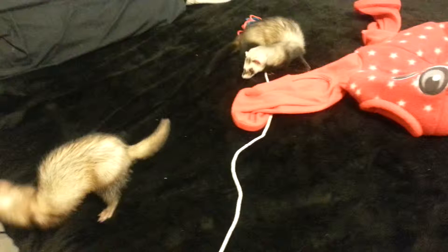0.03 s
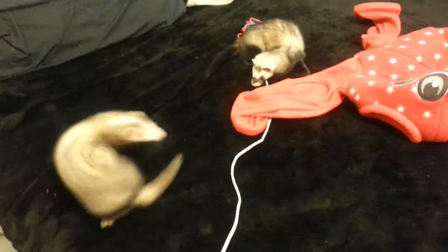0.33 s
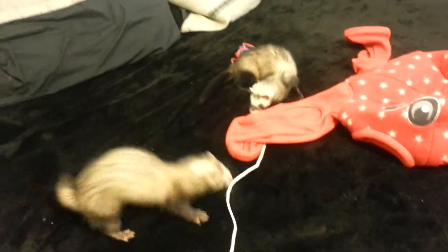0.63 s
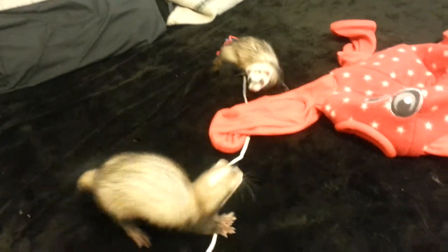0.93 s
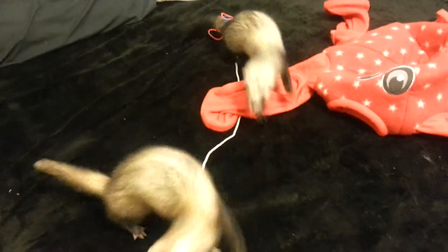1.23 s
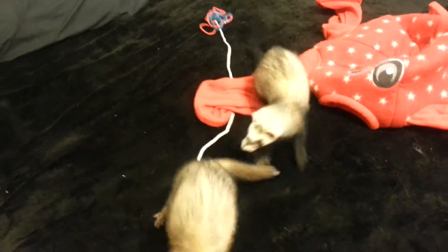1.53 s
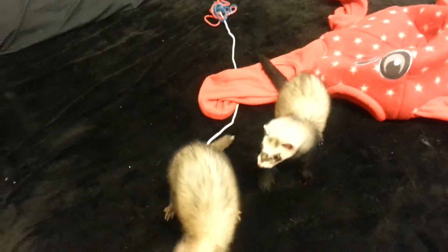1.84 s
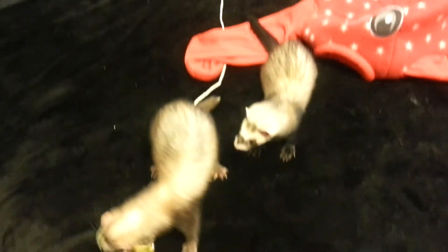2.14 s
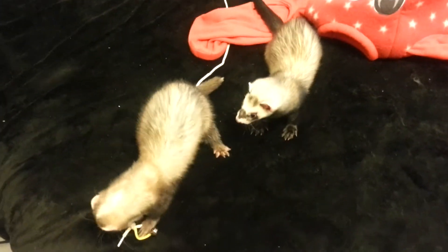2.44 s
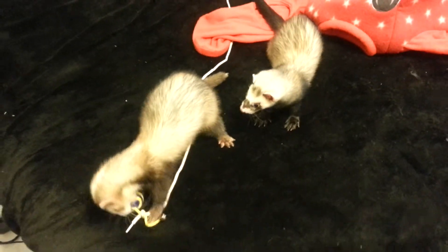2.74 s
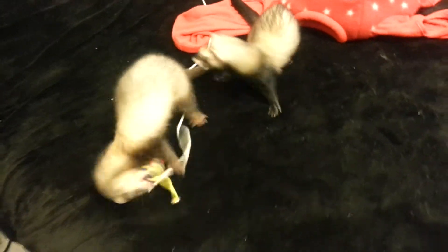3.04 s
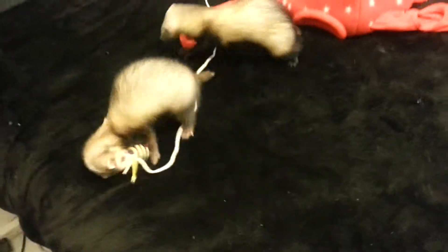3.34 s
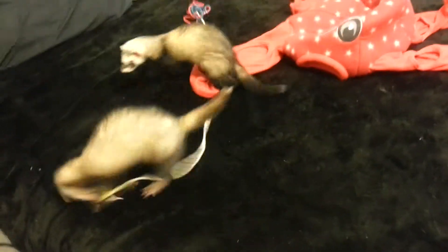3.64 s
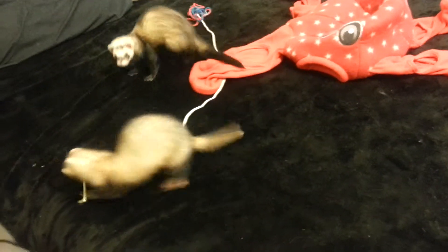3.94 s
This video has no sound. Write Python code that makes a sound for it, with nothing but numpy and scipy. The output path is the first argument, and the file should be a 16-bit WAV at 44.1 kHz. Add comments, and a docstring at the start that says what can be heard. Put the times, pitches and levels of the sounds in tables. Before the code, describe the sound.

A toy's small bell jingles faintly from about 1.6 seconds, then from 3 seconds to the end the toy crinkles, snaps and jingles louder, slightly to the right. Ferrets scuff softly over a blanket, with thin rubbing squeaks in the first second and faint clucks around 1.4 to 1.8 and at 3.4 seconds. Soft low bumps hit the close microphone throughout, over a quiet room hum.

```python
"""A quiet room with a low mains hum; two ferrets play on a fleece blanket, close to a hand-held camera.
Paws and fur scuff over the cloth, and a few clucks pulse from the throat. The ferrets tug a string toy,
right of centre, whose small bell jingles as its pellet strikes the shell; near the end the toy crinkles
and snaps. Soft low bumps reach one microphone port at a time."""
import sys
import numpy as np
from scipy import signal
from scipy.fft import rfft, irfft, next_fast_len
from scipy.io import wavfile
from scipy.ndimage import map_coordinates

SR = 44100
rng = np.random.default_rng(int(sys.argv[2]) if len(sys.argv) > 2 else 0)


def int16_out(signal):
    """Quantize to a 16-bit WAV file."""
    q = np.round(np.clip(np.atleast_2d(signal).T, -1, 1) * 32767)
    wavfile.write(sys.argv[1], SR, q.astype(np.int16))


N = 176400  # 4 s

# Spectrum of the toy's creases and snaps: f/Hz, level/dB
TOY_SPECTRUM = [(300, -26), (1500, -17.5), (2400, -12), (3500, 0), (4500, 2.5), (6200, -5.5), (8600, -4),
                (11800, -7), (15000, -9.5)]


def bell():
    """In each shake a pellet strikes the shell and rings its modes anew, each time slightly detuned."""
    # Shakes of the bell: t/s, length/s, level/dB, weight of deep modes/dB, weight of high modes/dB
    shakes = [(1.612, 0.028, -58, 7, 1), (1.639, 0.016, -53.5, 13, 3), (1.678, 0.041, -55, 0, -1),
              (1.81, .02, -60.5, 4, 2), (1.846, 0.014, -57, 2, 2), (1.876, .01, -54.5, -13, -9),
              (1.908, 0.017, -62.5, 0, 13), (1.994, 0.024, -59, 1, 7), (2.04, .012, -54.5, 9, 5.5),
              (2.497, 0.014, -56.5, 3, 11), (3.132, 0.008, -47, -1, -5), (3.196, 0.016, -47, -4, 12),
              (3.264, 0.0099, -40, -16, -2), (3.284, 0.029, -42, -6, -8), (3.325, 0.015, -49, 2, 2),
              (3.368, 0.034, -49, -4, 9.5), (3.433, .057, -52, 4, 8), (3.541, 0.01, -43, -6, 5.5),
              (3.56, .02, -42, -3, 2), (3.625, 0.017, -43, 0, 7), (3.655, 0.049, -42, 0, 1),
              (3.71, 0.028, -47.5, 4, 7), (3.783, .01, -45.5, -9, -7), (3.85, 0.015, -43, 0, 0),
              (3.872, 0.083, -50.5, 14, 8), (3.981, 0.015, -52, 2, 8)]
    # Modes of the shell: f/Hz, level/dB, t60/s
    modes = [(4170, -6, 0.15), (4340, -14, 0.15), (4818, 2.5, 0.089), (4850, -1, 0.066),
             (9240, -13.5, 0.074), (9415, -14.5, 0.1), (10710, -9, 0.095)]
    deep_hz, high_hz = 4500, 7000  # deep modes lie below the first, high modes above the second
    strikes_per_s, loss_per_strike_db, scatter_db, detune = 130, 1.2, 3, 0.0018
    out, t = np.zeros(N), np.arange(SR // 4) / SR
    hz, mode_db, t60 = np.transpose(modes)[..., None]
    decay = amp(mode_db - 60 * t / t60)
    for s, length, db, deep_db, high_db in shakes:
        shake = np.zeros(len(t))
        slip, chance = rng.random(16), rng.standard_normal((16, 3, len(modes), 1))
        weight_db = deep_db * (hz < deep_hz) + high_db * (hz > high_hz)
        for k in range(min(len(slip), 1 + int(length * strikes_per_s))):
            force, mistune, phase = chance[k]
            ring = decay * np.sin(2 * np.pi * (hz * (1 + detune * mistune) * t + phase))
            gain = amp(scatter_db * force - loss_per_strike_db * k + weight_db)
            add(shake, (k - slip[k] * (k > 0)) / strikes_per_s, np.sum(ring * gain, axis=0))
        add(out, s, amp(db) * shake / np.std(shake[:int(length * SR) + SR // 100]))
    low = filtered(out, lambda f: f < high_hz)
    high = out - low
    return from_toy(low * pan(-10) + high) + room(out, wet_db=-2)


def crinkle():
    """The crumpled toy gives dense tiny crease clicks, a hiss and snaps, all from one spot in the room."""
    # How hard the toy is crumpled: t/s, level/dB
    crumple = [(3, -67), (3.128, -59.5), (3.14, -49.5), (3.195, -47), (3.24, -56), (3.305, -51.5),
               (3.35, -59.5), (3.53, -54), (3.585, -45), (3.635, -48.5), (3.665, -41), (3.735, -50),
               (3.812, -55), (3.821, -44), (3.87, -51), (3.92, -59)]
    # The toy's colour across the ports: f/Hz, left minus right/dB
    balance = [(3200, 0), (4600, -9), (6300, -4.5), (8300, 2.5), (12000, 1.5)]
    creases_per_s, spread_db = 700, 5.5
    creases = (rng.random(N) < creases_per_s / SR) * rng.choice([-1, 1], N)
    creases = creases * amp(spread_db * np.minimum(rng.standard_normal(N), 2))
    hiss = 0.41 * rng.standard_normal(N)
    envelope = amp(curve(crumple)) * (np.arange(N) / SR > crumple[0][0])
    toy = envelope * unit(coloured(unit(creases) + hiss, TOY_SPECTRUM)) + snaps()
    at_ports = from_toy(toy) + room(toy.mean(axis=0), wet_db=-1.5)
    return filtered(at_ports, lambda hz: amp(along(balance, hz) * np.array([[1], [-1]]) / 2))


def snaps():
    """Single sharp cracks of the toy, partly different at each port; the hard ones have a bright edge."""
    # Cracks, before colouring: t/s, level/dB, edge relative to body/dB
    cracks = [(3.213, -26.5, -18), (3.3019, -31.5, -19), (3.436, -27.5, -16), (3.5742, -27.5, 8),
              (3.5877, -32, 3), (3.6161, -24, 4.5), (3.653, -28, -1), (3.7465, -25.5, -13),
              (3.7553, -30, 2), (3.7848, -21.5, -19), (3.818, -31, 0)]
    # Bright edge of a hard snap: f/Hz, level/dB
    edge_spectrum = [(5000, -22), (8900, 3.5), (15000, -12)]
    t60_s = 0.0089
    body, edge, t = np.zeros((2, N)), np.zeros((2, N)), np.arange(SR // 20) / SR
    for s, db, edge_db in cracks:
        crack = (rng.standard_normal(len(t)) + rng.standard_normal((2, len(t)))) * amp(-60 * t / t60_s)
        crack /= np.std(crack[:, :SR // 1000])
        add(body, s, amp(db) * crack)
        add(edge, s, amp(db + edge_db) * crack)
    return (coloured(body, TOY_SPECTRUM) + coloured(edge, edge_spectrum)) / 2


def from_toy(x):
    """The toy lies to the right, so its sound reaches the left port a little later."""
    lag_s = .00011
    return filtered(x, lambda hz: np.exp(1j * np.pi * hz * lag_s * np.array([[-1], [1]])))


def clucks():
    """A ferret clucks close by: a handful of slightly rough throat pulses each time."""
    # Clucks: t/s, length/s, level/dB, f/Hz
    calls = [(1.421, 0.038, -49.5, 226), (1.469, 0.023, -62, 224), (1.698, 0.029, -58.5, 219.4),
             (1.797, 0.034, -50, 221), (3.416, 0.016, -53.5, 254)]
    # Resonances of the throat: f/Hz, level/dB
    throat = [(120, -28), (225, -12), (450, -3.5), (680, -4.5), (900, 1), (1100, -24), (1400, -16),
              (2000, -24), (4000, -40)]
    roughness, jitter = 0.39, .015
    voice, t = np.zeros(N), np.arange(SR // 10) / SR
    for s, length, db, hz in calls:
        phase = 2 * np.pi * np.cumsum(hz * (1 + jitter * wobble(150)[:len(t)])) / SR
        tone = unit(sum(amp(along(throat, k * hz)) * np.cos(k * phase) for k in range(1, 12)))
        rasp = noise(throat)[0, :len(t)] * (1 + np.cos(phase))
        swell = np.sin(np.pi * np.clip(t / length, 0, 1))
        add(voice, s, amp(db) * swell * (tone + roughness * rasp))
    return voice + room(voice, wet_db=-6)


def scuffs():
    """Paws, fur and bodies rub the fleece: a soft rasp with a squeak, a finer hiss, and dull drags."""
    # Scuffs of paws and fur: t/s, length/s, level/dB, hiss relative to rasp/dB
    strokes = [(0.457, 0.088, -58, -5), (1.068, 0.095, -59.5, 2), (1.265, .04, -62, 2),
               (1.687, 0.13, -59, -1.5), (2.229, 0.11, -59.5, 1.5), (2.334, 0.065, -60.5, 2),
               (2.515, 0.066, -59, 6), (2.868, 0.054, -60.5, -6), (2.935, 0.063, -58.5, -1)]
    # Drags of a body over the blanket: t/s, length/s, level/dB
    drags = [(1.253, 0.078, -55.5), (3.13, 0.25, -58.5), (3.532, 0.085, -56), (3.605, 0.066, -49.5),
             (3.683, 0.2, -59.5)]
    # Rasp of the cloth: f/Hz, level/dB
    cloth = [(900, -16), (2900, -0.5), (4700, -4.5), (6000, -17), (12000, -31)]
    # Hiss of the fur: f/Hz, level/dB
    fur = [(2500, -5.5), (4500, 4.5), (6500, 1.5), (9000, 0), (12000, -2), (15000, -22)]
    # Dull rub of a body: f/Hz, level/dB
    body = [(100, -28), (300, 0.5), (700, -3.5), (1000, -7), (2000, -17.5), (5000, -36)]
    rasp = sum(amp(db) * stroke(s, length) for s, length, db, _ in strokes)
    hiss = sum(amp(db + hiss_db) * stroke(s, length) for s, length, db, hiss_db in strokes)
    drag = sum(amp(db) * stroke(s, length) for s, length, db in drags)
    whine = sum(amp(db - 3.5) * squeak(s, length, hz=3050) for s, length, db, _ in strokes)
    flicker = amp(1.2 * wobble(90))
    return flicker * (rasp * noise(cloth) + whine + hiss * noise(fur) + drag * noise(body))


def squeaks():
    """Thin squeaks where something rubs."""
    # Rubs: t/s, length/s, level/dB, starting f/Hz
    rubs = [(.385, 0.031, -62, 5540), (0.551, 0.054, -57, 4660), (1.081, 0.096, -65, 2890)]
    return sum(amp(db) * squeak(s, length, hz) for s, length, db, hz in rubs)


def squeak(s, length, hz):
    """One rub: a narrow band of noise whose pitch falls through the stroke."""
    half_width_hz, fall_per_s = .05 * hz, 1
    age = np.clip(np.arange(N) / SR - s, 0, 2 * length)
    phase = 2 * np.pi * np.cumsum(hz * np.exp(-fall_per_s * age)) / SR
    flutter = unit(filtered(rng.standard_normal((2, N)), lambda f: 1 / (1 + (f / half_width_hz) ** 2)))
    return stroke(s, length) * flutter * np.sqrt(2) * np.sin(phase)


def bumps():
    """Right at the microphone: each bump is one dip and push of pressure, almost wholly in one port."""
    # Soft bumps: t/s, level/dB, f/Hz, port (0 left, 1 right)
    knocks = [(.199, -24, 219, 0), (.261, -37.5, 133, 1), (.41, -35, 185, 0), (.569, -29.5, 122, 0),
              (.578, -30.5, 159, 0), (0.649, -35.5, 161, 0), (.75, -25.5, 173, 0), (.961, -34.5, 133, 1),
              (.982, -36, 202, 1), (1.003, -31.5, 164, 1), (1.278, -33, 127, 1), (2.042, -35, 177, 0),
              (2.059, -33, 125, 0), (2.122, -36.5, 84.5, 1), (2.289, -33, 154, 0), (3.023, -24, 211, 0),
              (3.076, -32, 166, 1), (3.117, -34.5, 187, 0), (3.166, -32.5, 160, 0), (3.552, -33, 170, 1),
              (3.563, -30.5, 162, 1), (3.752, -34, 154, 1)]
    half_width_cycles, leak_db = 0.42, -51
    out, t = np.zeros((2, N)), np.arange(-SR // 20, SR // 20) / SR
    for s, db, hz, port in knocks:
        push = np.sin(2 * np.pi * hz * t + np.pi / 4) / np.cosh(np.pi / 2 * hz * t / half_width_cycles)
        ports_db = [[leak_db], [0]] if port else [[0], [leak_db]]
        add(out, s + t[0], amp(db) * amp(ports_db) * push)
    return out


def room(x, wet_db):
    """The room's reverberation at both ports; the treble dies first."""
    # Decay of the room: f/Hz, t60/s
    decay_times = [(200, 0.37), (2000, 0.28), (12000, 0.14)]
    hz, t, spectra = signal.stft(rng.standard_normal((2, SR // 2)), SR, nperseg=256)
    decay = amp(-60 * t / along(decay_times, hz)[:, None])
    tail = signal.istft(spectra * decay, SR, nperseg=256)[1]
    tail[:, :SR // 400] = 0  # gap before the first reflection
    return amp(wet_db) * signal.fftconvolve(x[None], tail / np.linalg.norm(tail[0]), axes=1)[:, :N]


def room_tone():
    """Steady room air, mains hum, and an uneven low rumble in each port."""
    # Room air: f/Hz, level/dB
    air_spectrum = [(40, -30), (70, -10), (110, -2.5), (170, -6), (300, -5), (620, -12.5), (1500, -15.5),
                    (4300, -19.5), (6400, -23.5), (9000, -21.5), (14000, -22)]
    # Likeness of the air at the two ports: f/Hz, correlation
    likeness = [(60, 0.18), (130, 0.25), (290, 0.6), (640, 0.24), (1400, 0.017)]
    # Low rumble: f/Hz, level/dB
    rumble_spectrum = [(20, -28), (60, -1.5), (130, -1), (250, -8), (500, -20), (1500, -49)]
    hum_hz, rumble_swing_db = 120.3, 5

    def mid_side_gains(hz):
        angle = np.arccos(np.clip(along(likeness, hz), -1, 1)) / 2
        return np.array([np.cos(angle), np.sin(angle)])

    mid, side = filtered(noise(air_spectrum), mid_side_gains)
    air = amp(-54.5) * unit(np.array([mid + side, mid - side])) * pan(-1.5)
    hum = amp(-61 + 0.92 * wobble(3.09)) * np.sqrt(2) * np.sin(2 * np.pi * hum_hz * np.arange(N) / SR)
    rumble = unit(noise(rumble_spectrum) * amp(rumble_swing_db * np.array([wobble(12), wobble(13)])))
    return air + hum + amp(-58) * rumble


def amp(db):
    """Decibels to gain."""
    return 10 ** (np.asarray(db) / 20)


def unit(x):
    """Scale to rms 1."""
    return x / np.sqrt(np.mean(x ** 2) + 1e-20)


def along(points, hz):
    """Read (f/Hz, value) points on a log axis."""
    f, v = np.transpose(points)
    return np.interp(np.log(hz + 1), np.log(f + 1), v)


def curve(rows):
    """One value per sample from (t/s, value) rows."""
    return np.interp(np.arange(N) / SR, *np.transpose(rows))


def wobble(rate):
    """A smooth random curve, rate knots a second."""
    return map_coordinates(rng.standard_normal(400), [np.arange(N) * rate / SR], mode="wrap")


def stroke(s, length):
    """Envelope of a rub: a smooth swell and a slower fall."""
    progress = (np.arange(N) / SR - s) / length
    return np.sin(np.pi / 2 * np.interp(progress, [-.1, 0.26, 1.4], [0, 1, 0])) ** 2


def pan(db):
    """Port gains for a left-minus-right level."""
    return amp(np.array([[db], [-db]]) / 2)


def add(track, s, sound):
    """Mix a sound into a track at s seconds."""
    i = max(0, round(s * SR))
    part = track[..., i:i + sound.shape[-1]]
    part += sound[..., :part.shape[-1]]


def filtered(x, response):
    """x through a frequency response."""
    m = next_fast_len(N + SR // 2)
    return irfft(rfft(x, m) * response(np.fft.rfftfreq(m, 1 / SR)), m)[..., :N]


def coloured(x, spectrum):
    """x through a (f/Hz, level/dB) colour."""
    return filtered(x, lambda hz: amp(along(spectrum, hz)))


def noise(spectrum):
    """Unrelated left and right coloured noise of rms 1."""
    return unit(coloured(rng.standard_normal((2, N)), spectrum))


def scene():
    """The ferrets, their toy and the room at the two microphone ports."""
    return room_tone() + bumps() + clucks() + bell() + scuffs() + squeaks() + crinkle()


def record(dry):
    """The camera fades in and keeps nothing above its band limit."""
    # The camera's opening gain: t/s, level/dB
    fade_in = [(0, -100), (.09, -56), (.125, -14.5), (.16, -5.5), (.195, 1.5)]
    top_hz = 14700
    return filtered(dry * amp(curve(fade_in)), lambda hz: 1 / (1 + (hz / top_hz) ** 160))


dry = scene()
out = record(dry)
int16_out(out)
```